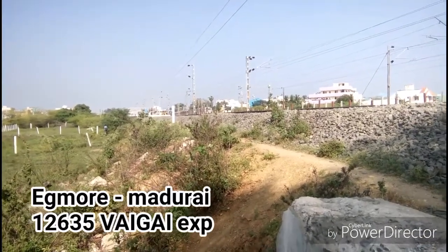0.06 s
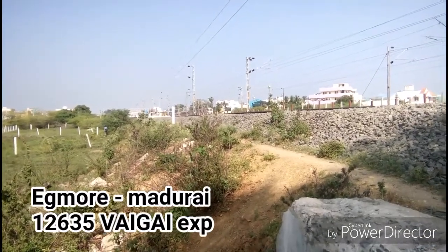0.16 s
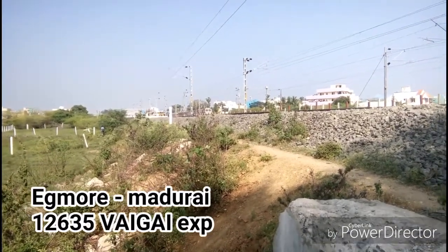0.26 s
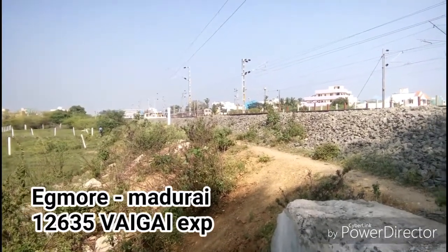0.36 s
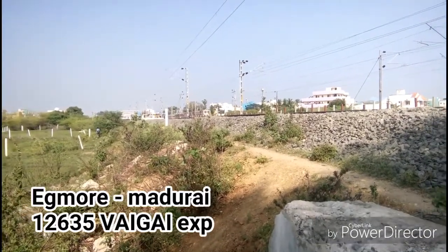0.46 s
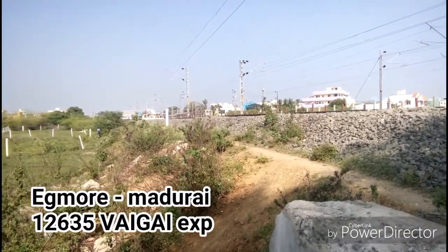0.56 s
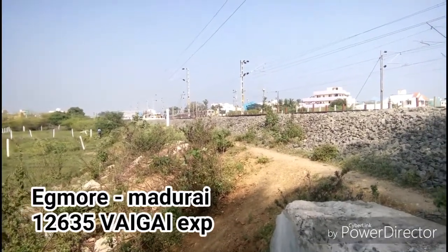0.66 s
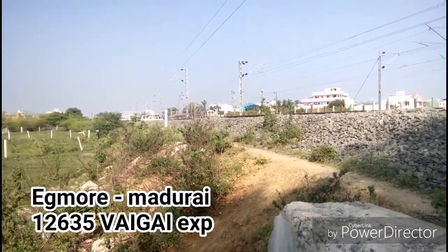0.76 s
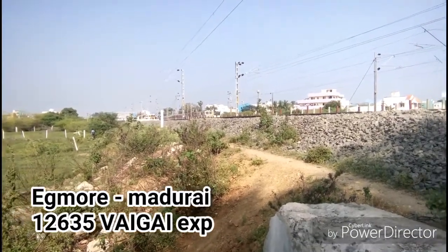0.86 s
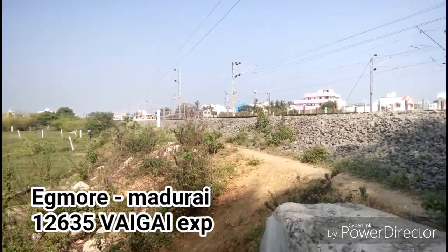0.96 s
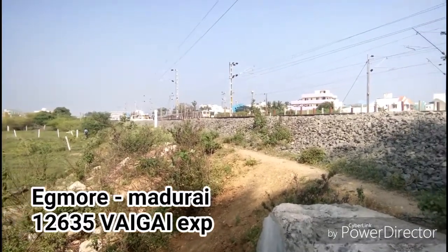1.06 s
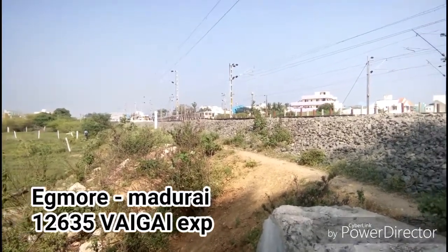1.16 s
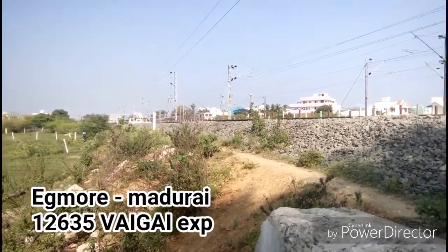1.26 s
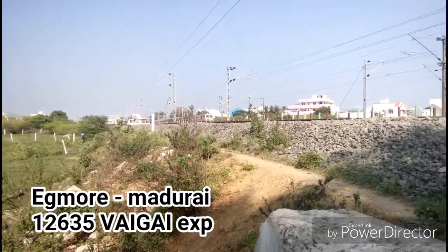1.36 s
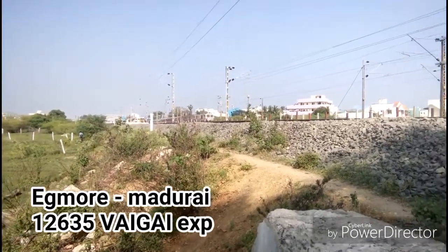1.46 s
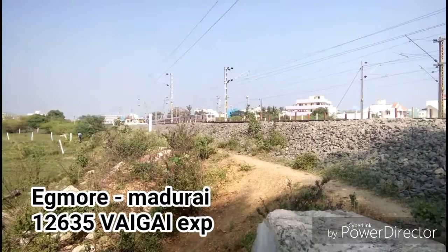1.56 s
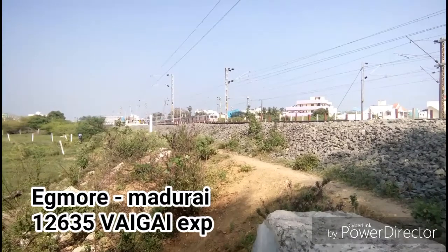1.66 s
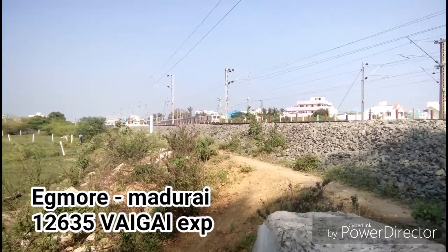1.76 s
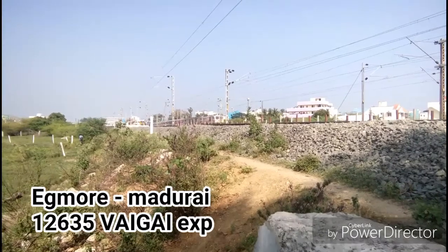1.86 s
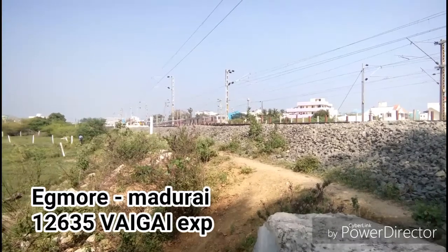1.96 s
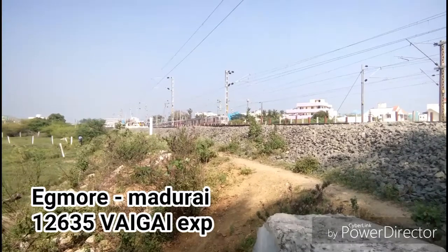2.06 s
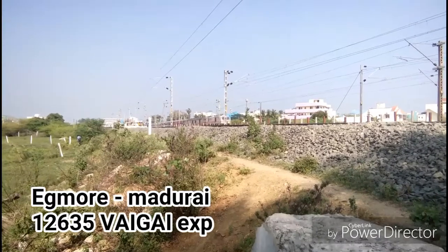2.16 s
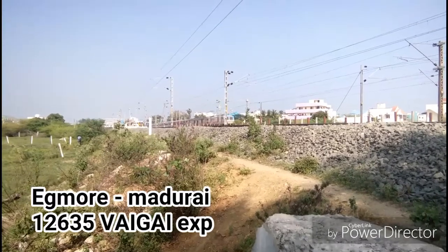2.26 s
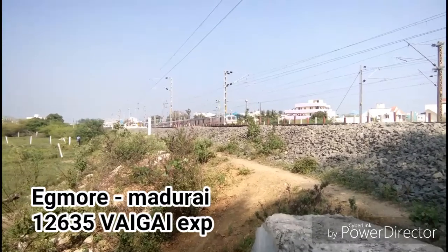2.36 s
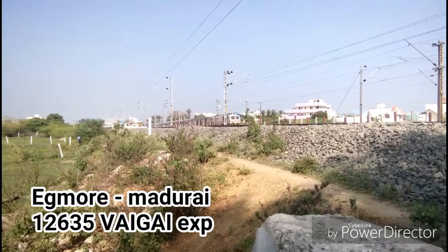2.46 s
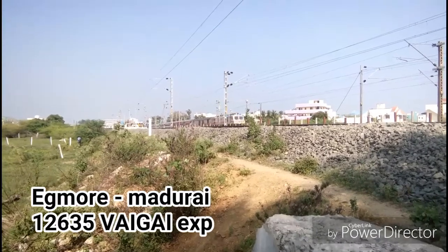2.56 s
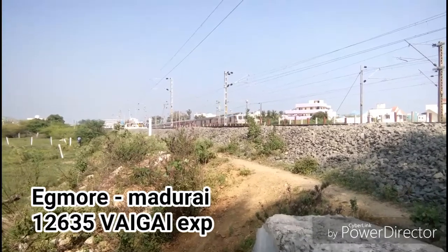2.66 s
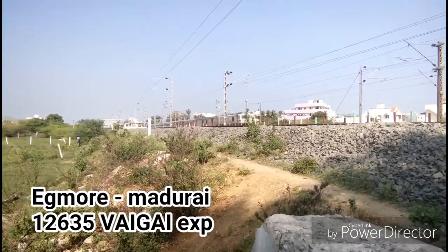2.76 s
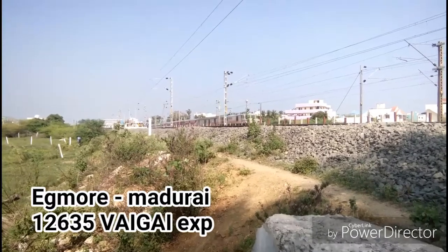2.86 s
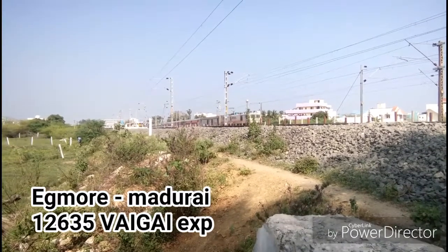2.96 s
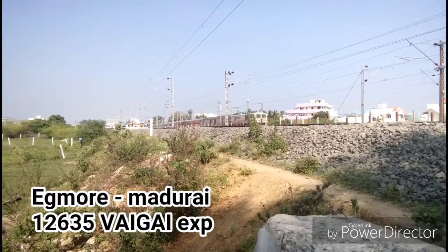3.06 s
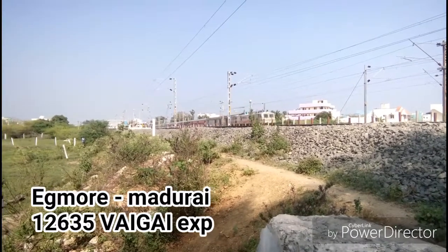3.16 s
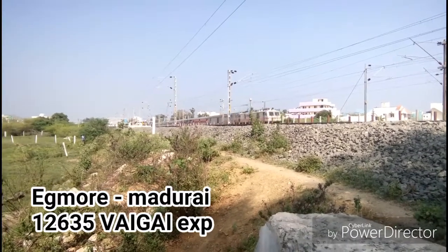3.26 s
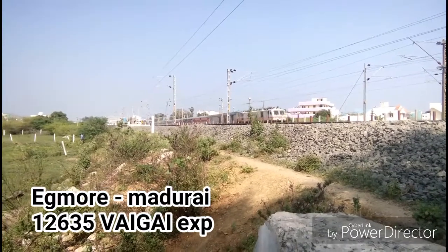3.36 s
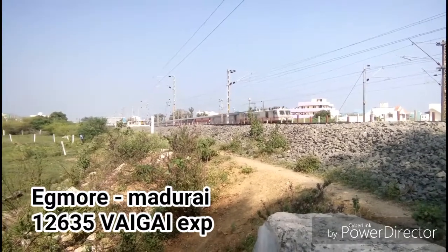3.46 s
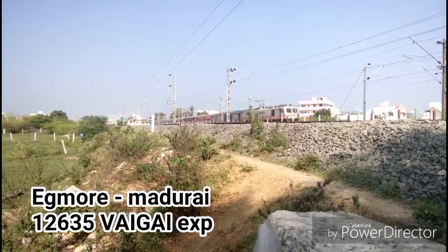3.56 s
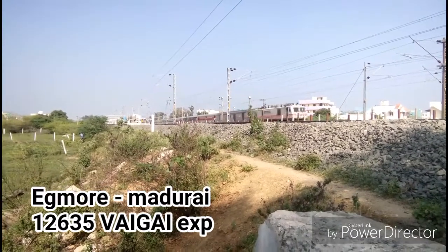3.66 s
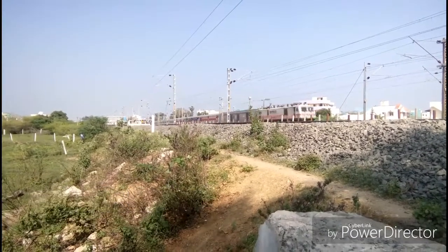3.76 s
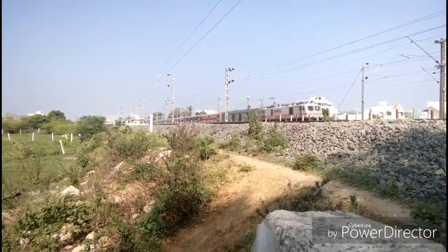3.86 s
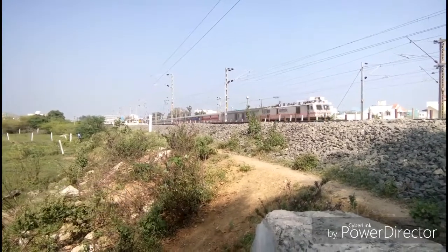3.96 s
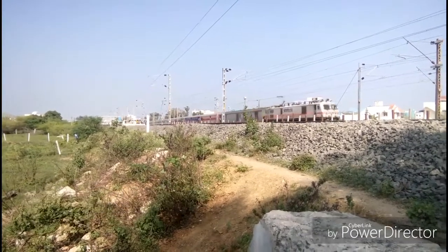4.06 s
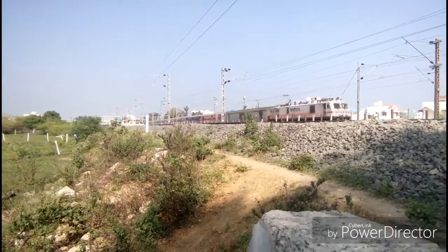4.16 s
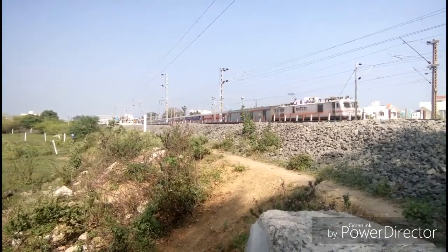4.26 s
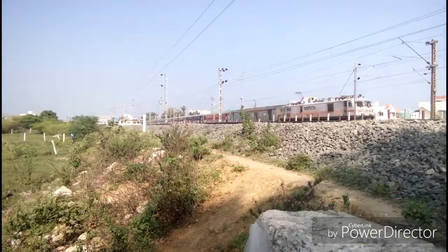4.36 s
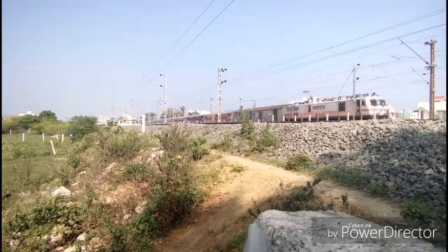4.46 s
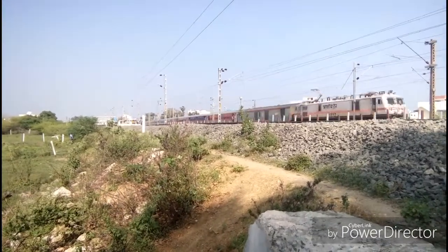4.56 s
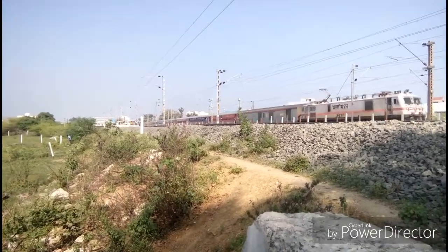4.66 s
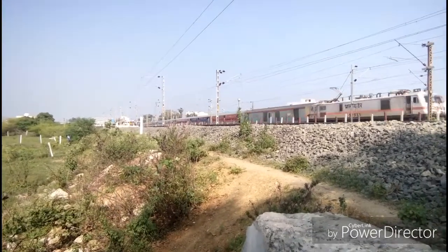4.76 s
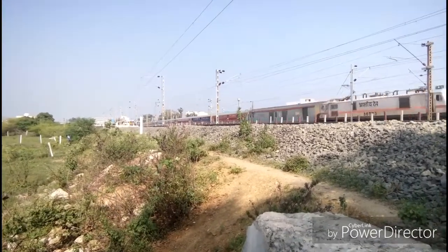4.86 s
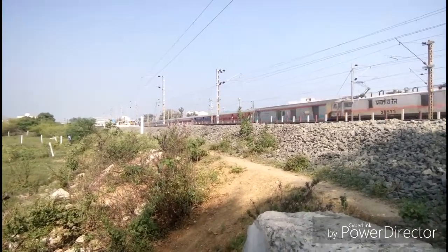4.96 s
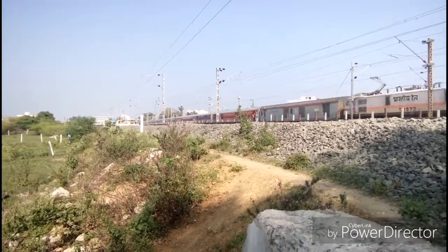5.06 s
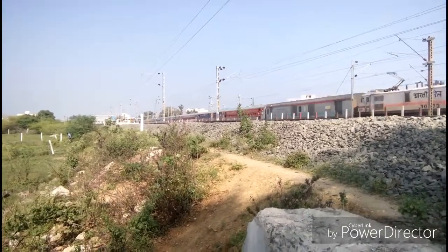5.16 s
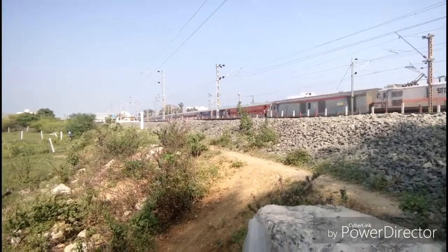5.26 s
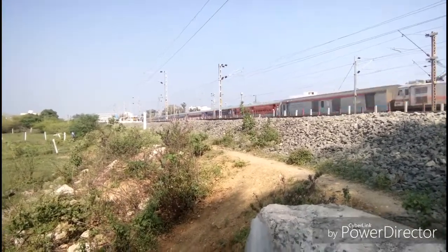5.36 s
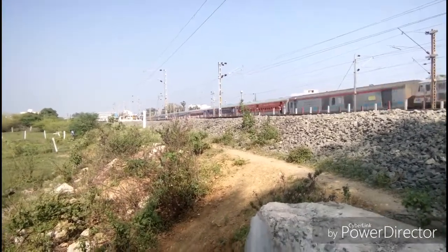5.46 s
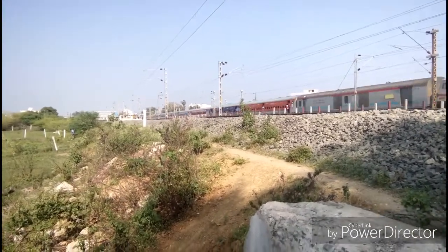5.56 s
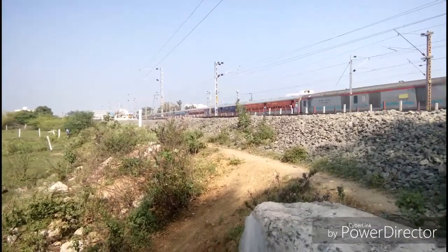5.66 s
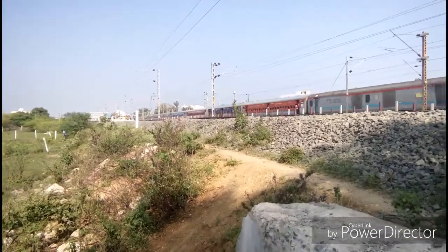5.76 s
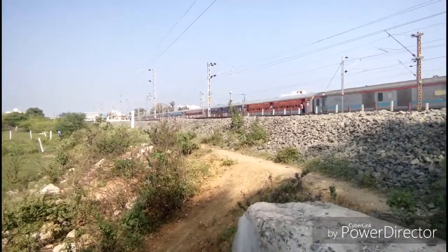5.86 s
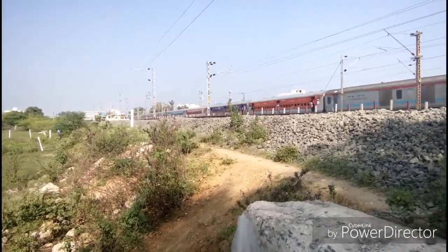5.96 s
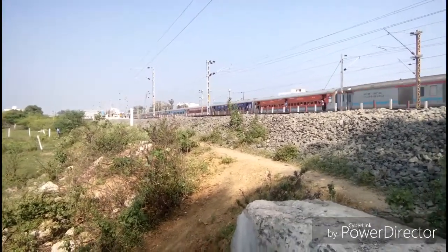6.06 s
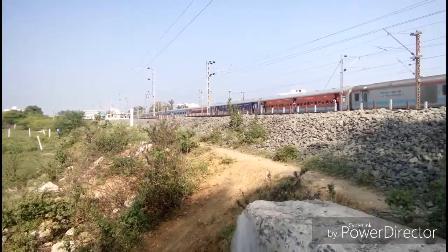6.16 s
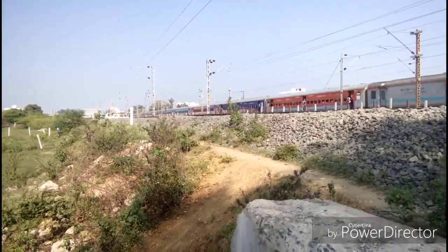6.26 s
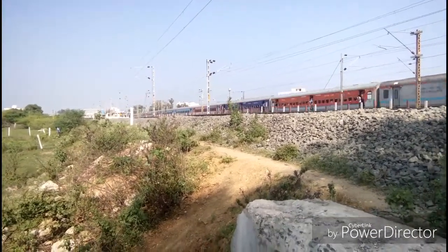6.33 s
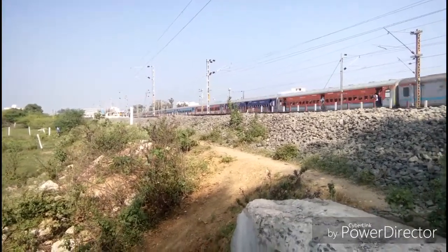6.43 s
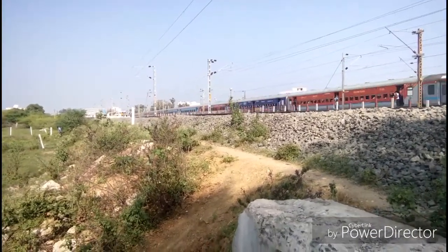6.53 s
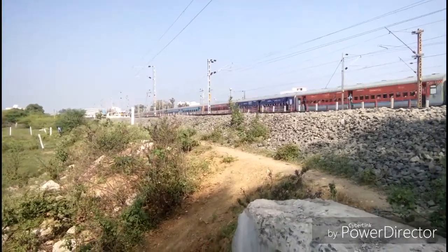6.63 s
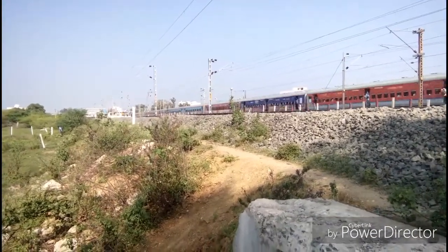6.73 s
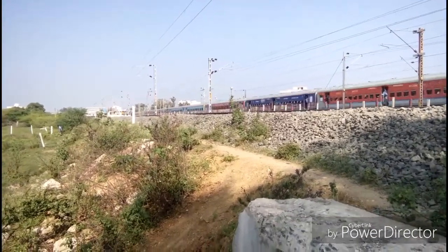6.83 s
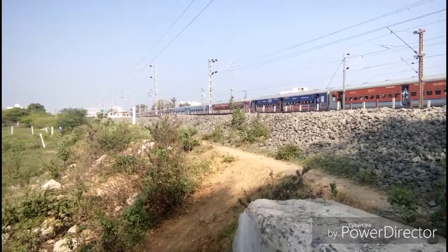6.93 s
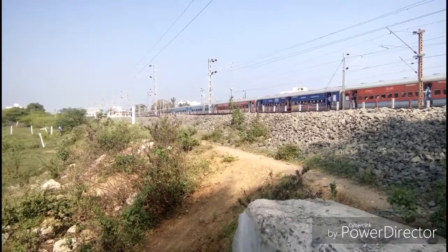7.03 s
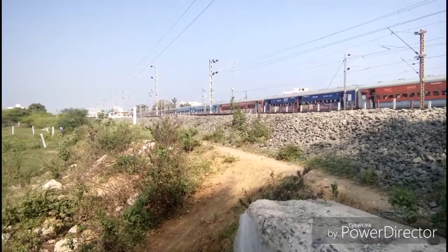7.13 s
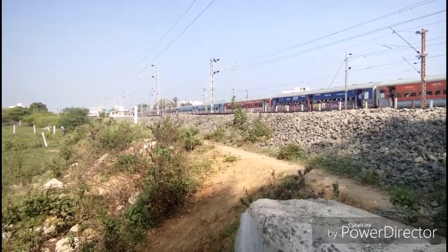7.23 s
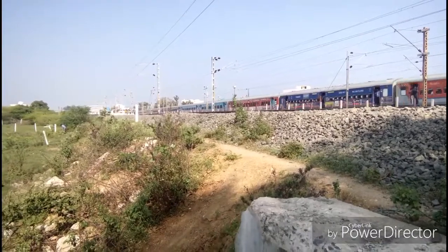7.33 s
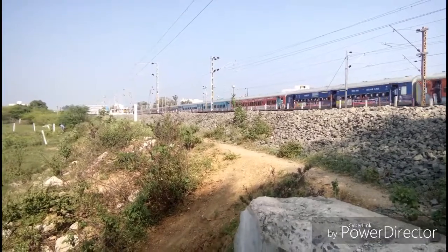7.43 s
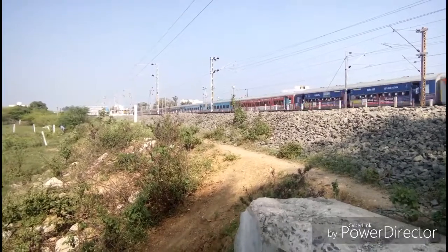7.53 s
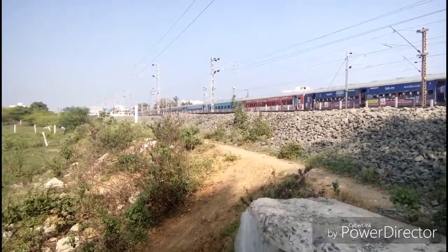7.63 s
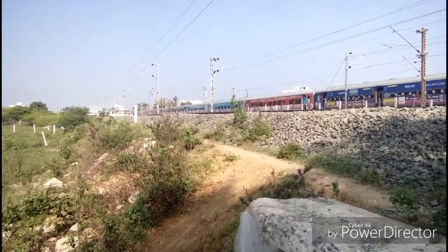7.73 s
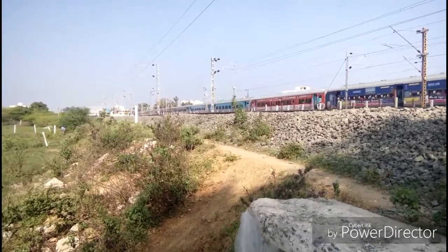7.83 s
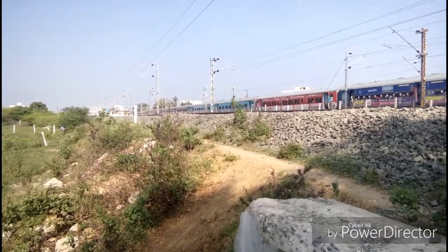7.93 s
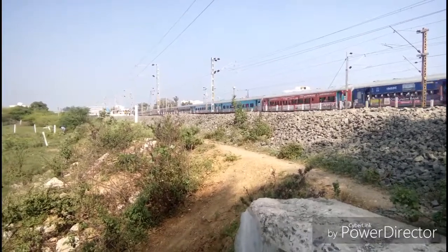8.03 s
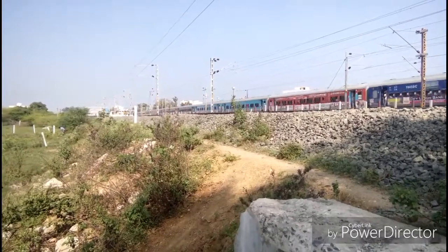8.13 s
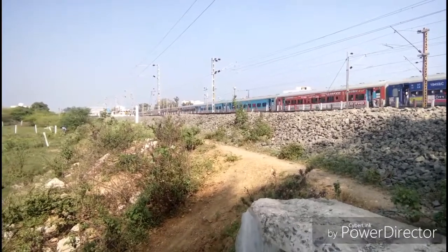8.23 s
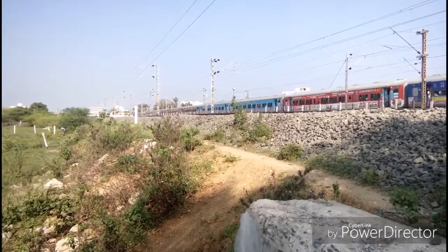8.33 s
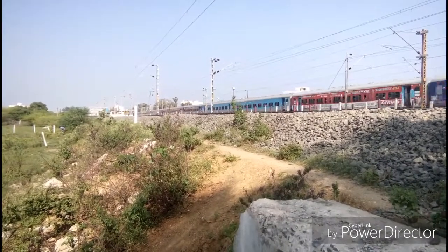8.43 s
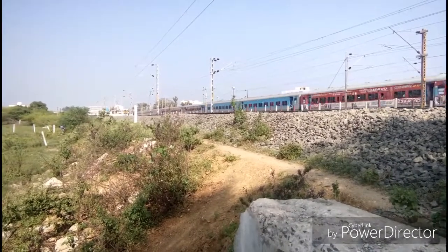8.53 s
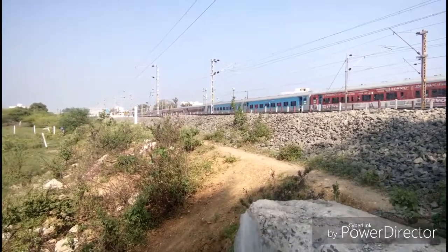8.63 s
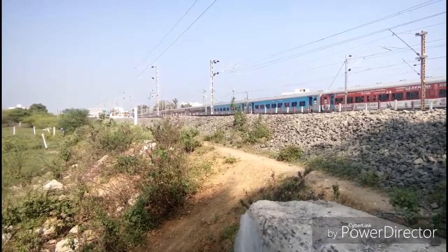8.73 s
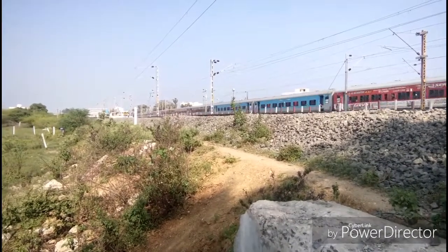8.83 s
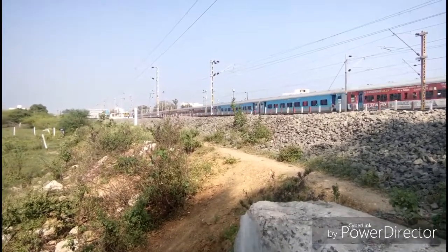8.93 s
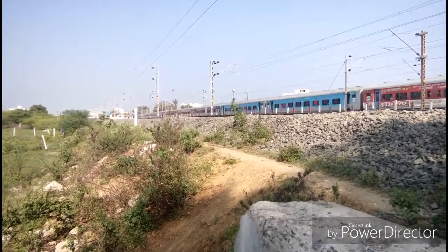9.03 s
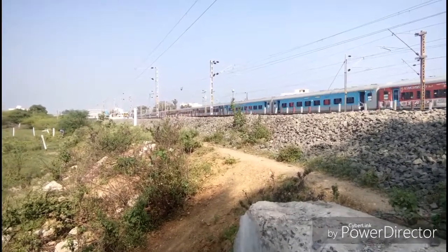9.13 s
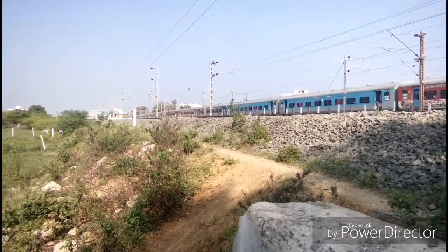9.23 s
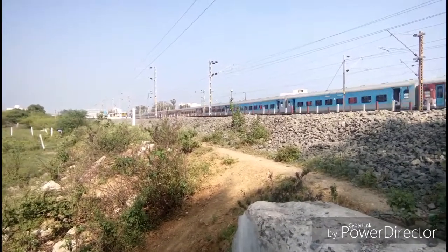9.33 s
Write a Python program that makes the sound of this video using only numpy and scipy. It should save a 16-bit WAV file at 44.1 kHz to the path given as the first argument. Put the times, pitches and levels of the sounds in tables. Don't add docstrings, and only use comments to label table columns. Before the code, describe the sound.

An open, dry outdoor place beside a railway bank. From 0 to 3 s a distant train makes a soft, uneven low rumble and thin roar, with a faint wavering whine near 570 Hz; small birds give brief falling chirps in the first second and a cluster of sharp, high calls at 2.4-3 s. From 3 s the rolling noise builds and faint low thuds begin; a longer bird pipe sounds near 4.7 s. Between 5.5 and 7 s the engine passes: full rumble, roar, hiss, thick thumps and knocks, and fluttering gear whine sliding downward. Carriages keep rattling past, hissing more, with heavier thumps from 7.7 s. At about 8.4 s a two-tone air horn speaks, low note first, then brightens into a loud, brassy, buzzing chord around 281 and 323 Hz. It wavers with echoes, dulls slightly after 9.1 s and continues to the end at 9.4 s.

```python
import sys
import numpy as np
from scipy import signal
from scipy.fft import rfft, irfft, next_fast_len
from scipy.io import wavfile
from scipy.ndimage import uniform_filter1d

SR = 44100
rng = np.random.default_rng(int(sys.argv[2]) if len(sys.argv) > 2 else 0)


def undo_db(level):
    steps = np.asarray(level, float) / 20
    return 10 ** steps


def store_pcm(level_fs):
    pcm = np.round(np.clip(level_fs, -1, 1) * 32767).astype(np.int16)
    wavfile.write(sys.argv[1], SR, np.atleast_2d(pcm).T)


N = 414099
T = np.arange(N) / SR


def curve(table):
    s, *columns = np.transpose(table)
    return [np.interp(T, s, c) for c in columns]


def bumps(events):
    return sum(db * np.exp(-((T - s) / half_s) ** 2) for s, half_s, db in events)


def walk(rate):
    hold = int(SR / rate)
    steps = np.repeat(rng.standard_normal(N // hold + 1), hold)
    return 1.01 * uniform_filter1d(uniform_filter1d(steps, hold), hold)[:N]


def tone(hz, db, scatter, rate):
    share = np.clip(scatter, 0, 1)
    paths = np.sqrt(1 - share) + np.sqrt(share / 2) * (walk(rate) + 1j * walk(rate))
    turning = np.exp(2j * np.pi * np.cumsum(hz) / SR)
    return np.sqrt(2) * undo_db(db) * np.real(paths * turning)


def band(colour, lo_hz, hi_hz):
    size = next_fast_len(N)
    log_hz = np.log(np.arange(1, size // 2 + 2) * SR / size)
    hz, db = np.transpose(colour)
    low_edge = 1 + np.exp(12 * (np.log(lo_hz) - log_hz))
    high_edge = 1 + np.exp(12 * (log_hz - np.log(hi_hz)))
    shape = undo_db(np.interp(log_hz, np.log(hz), db)) / np.sqrt(low_edge * high_edge)
    x = irfft(rfft(rng.standard_normal(size)) * shape, size)[:N]
    return x / x.std()


def patchy(x, depth_db, streak_db):
    hz, _, cells = signal.stft(x, SR, nperseg=1024)

    def blur(wide, long):
        grain = uniform_filter1d(rng.standard_normal(cells.shape), wide, axis=0)
        return np.sqrt(wide * long) * uniform_filter1d(grain, long, axis=1)

    db = depth_db * blur(12, 5) + streak_db * blur(2, 6)
    db = db * np.clip(hz / 2200, 0, 1)[:, None] ** 1.5
    return signal.istft(cells * undo_db(db), SR)[1][:N]


# (time [s], peak level [dB], low note level [dB], last note level [dB], stretch [ratio])
NEAR_CALLS = [
    (2.449, -51.5, -58, -67, .8),
    (2.612, -48, -64, -64, 1.05),
    (2.778, -48, -70, -67, 1.0),
    (2.951, -50.5, -72, -71, .75),
]
# (time after start [s], length [s], from [Hz], to [Hz], level [dB])
CALL_NOTES = [
    (0, .008, 5700, 4740, -4),
    (0.012, 0.02, 5500, 4800, 0),
    (0.04, .016, 4450, 4400, 5.5),
    (.053, .011, 4500, 5350, 11),
]
# (time [s], length [s], from [Hz], to [Hz], peak level [dB])
FAR_CHIRPS = [
    (0, 0.053, 2960, 2970, -67),
    (0.056, .022, 2750, 2170, -55),
    (0.087, .007, 4900, 4200, -60),
    (.1, .05, 4250, 4200, -65),
    (0.178, 0.0068, 4900, 4200, -57),
    (0.524, 0.017, 1835, 1450, -45.5),
    (0.915, 0.043, 2970, 2970, -60),
    (.948, 0.022, 2750, 2300, -59),
    (4.735, 0.1, 2550, 2570, -54),
]


def bird():
    out = np.zeros(N)
    flutter_db = 1.5 * walk(250)
    chirps = list(FAR_CHIRPS)
    for s, top_db, low_db, last_db, stretch in NEAR_CALLS:
        for db, note in zip((top_db, top_db, low_db, last_db), CALL_NOTES):
            after, length, from_hz, to_hz, under_db = note
            chirps.append((s + after, length * stretch, from_hz, to_hz, db + under_db))
    for s, length, from_hz, to_hz, db in chirps:
        start = int(s * SR)
        u = np.linspace(0, 1, int(length * SR))
        phase = 2 * np.pi * np.cumsum(from_hz + (to_hz - from_hz) * u) / SR
        level = undo_db(db - 1 + flutter_db[start:start + len(u)])
        out[start:start + len(u)] += level * np.sin(np.pi * u) * np.sin(phase)
    return out


# (frequency [Hz], density [dB per Hz])
FAR_COLOUR = [(25, -31), (48, -10), (100, 0.5), (150, -13), (400, -20), (530, -16), (1320, -18.5),
              (2000, -22), (2550, -21.5), (2850, -30), (3600, -26.5), (4500, -30), (6400, -38), (7500, -52)]
# (frequency [Hz], density [dB per Hz])
NEAR_COLOUR = [(25, -11.5), (46, -31), (60, -4), (110, 3), (165, -7.5), (250, -7.5), (450, -15.5),
               (530, -17), (680, -18), (1420, -23), (1760, -20.5), (2020, -29.5), (5600, -45), (7600, -72)]
# (time [s], level [dB])
APPROACH = [(0, -16), (1, -15), (2.5, -14), (3.8, -11), (4.9, -7.5), (5.4, -5), (6.1, -1), (6.6, 0.5),
            (7.5, -.5), (8.4, 0), (9.39, 0.5)]
# (level abreast [dB], gain per approach [dB/dB], early through ground [s], surge share [ratio])
WHEEL_LAYERS = [
    (-31, 1.35, 0.17, 0.9),
    (-35.5, 1.63, 0.27, 0.52),
    (-37.5, 1.0047, 0.022, 0.05),
    (-45.5, 0.99, .02, 0.054),
]
# (time [s], half length [s], level [dB])
SURGES = [(.1, 0.21, -5), (0.577, 0.042, -18), (.68, 0.047, 4), (1.617, 0.042, 7), (1.07, .04, 6),
          (2.1, 0.065, -4), (2.22, .05, 5), (2.5, 0.23, -3.5), (4.08, 0.11, 0), (5.2, 0.042, 0),
          (9.22, 0.083, 4), (2.85, 0.07, 3), (3.56, 0.12, -3.5), (3.891, 0.068, 3.5), (4.36, .06, 3),
          (4.55, .06, -0.5), (4.92, 0.12, 1.5), (5.498, 0.039, -6.5), (5.7, 0.11, 4), (5.993, 0.12, -5),
          (6.24, 0.099, 4.5), (6.4, 0.051, -4.5), (6.62, 0.055, 0.5), (6.892, 0.07, -6.5),
          (7.06, 0.043, -1), (7.56, 0.074, 3.5), (7.709, 0.078, -5.5), (8.128, 0.055, 6), (8.25, .06, 1.5),
          (8.347, 0.038, -6), (8.43, .04, 5), (8.79, 0.031, 4), (9.007, 0.11, 1.5)]
# (time [s], half length [s], level [dB])
GUSTS = [
    (4.95, .12, -5),
    (5.4, .12, 1.5),
    (5.62, .05, -2),
    (5.82, .05, 1),
    (6.2, .06, -5),
    (6.38, .1, 3),
    (6.62, .05, -3),
    (7.02, .05, -2),
    (7.5, .05, -3),
    (8.1, 0.31, -2.5),
]


def rolling():
    near = np.clip((T - 2.5) / 3.5, 0, 1)
    approach_db, surge_db = curve(APPROACH)[0], bumps(SURGES)
    levels = []
    for top_db, slope, early_s, share in WHEEL_LAYERS:
        levels.append(top_db + slope * np.interp(T + early_s, T, approach_db) + share * surge_db)
    levels[-1] += 1.76 * np.maximum(T - 6.5, 0)
    cutting = np.clip((T - 5.1) / 0.17, 0, 1) * np.clip((6.6 - T) / 2.3, 0, 1)
    levels[-1] += 1.3 * cutting
    edges_hz = [10, 150, 330, 1900, 9000]
    flicker_db = [1.3, 1.6, 0.5, 0.3]
    trim_db = [-1.0, 1.26, 2.5, -0.26]
    out = 0
    for k in range(4):
        far = band(FAR_COLOUR, *edges_hz[k:k + 2])
        close = band(NEAR_COLOUR, *edges_hz[k:k + 2])
        gain = undo_db(levels[k] + trim_db[k] + flicker_db[k] * walk(11))
        out = out + gain * (np.sqrt(1 - near) * far + np.sqrt(near) * close)
    thin = signal.sosfiltfilt(signal.butter(4, 4800, "high", fs=SR, output="sos"), out)
    out = out + (undo_db(bumps(GUSTS) - 0.5) - 1) * thin
    return patchy(out, depth_db=0.9, streak_db=2.3)


# (time [s], peak level [dB], pitch [Hz])
THUMPS = [(5.626, -21, 126), (5.774, -19, 147), (5.892, -21, 94.8), (6.042, -22, 82), (6.108, -22, 99),
          (6.254, -19.5, 134), (6.444, -25.5, 98), (6.772, -23.5, 105), (6.988, -20, 125),
          (7.168, -22, 81.7), (7.418, -23, 121), (7.745, -16, 101), (7.849, -20, 109), (8.077, -17, 100.7),
          (8.301, -12.5, 116.5), (8.421, -36, 107), (8.537, -15, 97.4), (8.592, -15.5, 121),
          (8.65, -17.5, 93), (8.807, -25, 216), (8.885, -18, 95.5), (8.929, -17.5, 128),
          (9.013, -15.5, 112), (9.05, -19, 140), (9.08, -20, 75), (9.127, -13, 148), (9.19, -19, 78)]
# (time [s], peak level [dB], pitch [Hz])
FAR_THUMPS = [(3.355, -43, 113.4), (3.498, -37, 99.6), (3.702, -43, 88.7), (3.812, -32, 91.5),
              (4.022, -37, 96.9), (4.113, -32, 96.9), (4.198, -32, 97), (4.334, -29, 96), (4.552, -35, 80),
              (4.902, -25, 92.3), (5.002, -30, 96.9), (5.118, -35, 102.4), (5.568, -27, 78.5)]
# (time [s], peak level [dB], pitch [Hz])
KNOCKS = [(5.562, -32.5, 280), (5.634, -22, 172), (5.707, -20.5, 245), (5.782, -20, 241), (5.89, -28, 200),
          (5.935, -29, 227), (6.028, -22, 233), (6.108, -18.5, 248), (6.18, -22, 210), (6.269, -21, 245),
          (6.437, -28, 189), (6.479, -40, 229), (6.544, -31, 230), (6.631, -32, 272), (6.671, -29, 210),
          (6.747, -29, 208), (6.828, -31, 253), (6.888, -25, 275), (6.984, -22, 204), (7.166, -21.5, 267),
          (7.264, -26, 238), (7.347, -22.5, 259), (7.407, -27, 203), (7.445, -31, 235), (7.504, -28, 223),
          (7.583, -25.5, 249), (7.685, -26.5, 241), (7.738, -26.5, 355), (7.8, -29, 270),
          (7.885, -27.5, 236), (7.965, -22, 257), (8.01, -23, 250), (8.091, -19.5, 258), (8.165, -28, 267),
          (8.317, -32, 321), (8.383, -24, 287)]


def bogies():
    out, t = np.zeros(N + SR), np.arange(SR // 5) / SR
    for s, db, hz in THUMPS + FAR_THUMPS:
        start = int(s * SR)
        shape = t / 0.014 * np.exp(1 - t / 0.011)
        overtone = 0.48 * np.exp(-t / 0.03) * np.sin(2 * np.pi * 2.5 * hz * t)
        ring = np.sin(2 * np.pi * hz * t) + overtone
        out[start:start + len(t)] += undo_db(db - 5) * shape * ring
    for s, db, hz in KNOCKS:
        start = int(s * SR)
        shape = t / 0.01 * np.exp(1 - t / 0.0084)
        out[start:start + len(t)] += undo_db(db - 3.5) * shape * np.sin(2 * np.pi * hz * t)
    return out[:N]


# (time [s], pitch [Hz])
GEAR_HZ = [(0, 572), (4.9, 571), (5.2, 569), (5.6, 564), (5.9, 553), (6.3, 550), (6.6, 544), (7.3, 532),
           (7.65, 518), (8.0, 514), (9.39, 510)]
# (time [s], level [dB])
GEAR_DB = [(0, -67), (1.55, -61.5), (1.95, -54), (2.25, -67), (2.55, -67), (2.8, -48), (3.75, -50),
           (4.14, -65), (4.19, -39.5), (4.65, -44), (5.0, -34.5), (5.35, -45), (5.7, -38), (5.98, -31),
           (6.7, -36), (7.2, -38), (8.3, -38), (8.7, -56)]
# (time [s], pitch [Hz], level [dB])
SECOND_MOTOR = [(0, 533, -63), (1.2, 528, -55), (1.75, 528, -58), (2.2, 540, -75), (2.6, 543, -58),
                (2.75, 539, -51), (3.1, 541, -48.5), (3.17, 541, -53), (3.3, 541, -48), (3.4, 540, -47),
                (3.48, 544, -53), (3.56, 540, -63), (3.66, 538, -48), (3.75, 537, -52), (4.0, 550, -63),
                (4.4, 530, -59)]
# (time [s], pitch [Hz], level [dB])
THIRD_MOTOR = [
    (.9, 516, -63),
    (2.1, 498, -60),
    (2.4, 502.3, -70),
    (2.9, 502, -58),
    (4.0, 498, -70),
    (5.0, 518.3, -48),
    (6.5, 507.6, -42),
    (7.0, 505, -40.5),
    (7.6, 499, -49),
]
# (time [s], pitch [Hz], level [dB])
BLOWER = [
    (3.1, 623, -77),
    (3.47, 620, -57),
    (3.56, 616, -64),
    (3.66, 622, -53),
    (3.85, 625, -58),
    (4, 622, -62),
    (4.3, 639, -54.5),
    (5.0, 632.4, -53.5),
    (5.4, 612, -68),
]
# (level abreast [dB], gain per approach [dB/dB])
OVERTONES_DB = [
    (-50, 1.5),
    (-41.5, 1.35),
]
# (time [s], pitch [Hz])
BLEND_HZ = [(0, 1716), (5.1, 1708), (5.7, 1690), (5.95, 1648), (6.3, 1628), (6.75, 1610), (7.05, 1570),
            (7.5, 1590), (7.85, 1555), (8.3, 1570), (9.39, 1545)]
# (time [s], half length [s], level [dB])
SHADOWS = [(3.0, 0.046, -13), (3.3, 0.035, -10), (3.45, .04, -3), (3.56, 0.043, -11), (3.65, .04, 3.5),
           (3.77, 0.038, -4), (4.3, 0.064, -6.5), (4.41, .05, -4), (5.1, 0.016, -12), (5.52, 0.02, -1),
           (5.7, 0.05, -7), (5.765, .015, -8), (5.8, 0.016, 2.5), (5.84, 0.017, -17), (5.925, .014, -8),
           (5.98, 0.034, 4.5), (6.045, 0.012, -10), (6.145, 0.029, -17), (6.23, 0.034, -5),
           (6.35, 0.07, -7), (6.555, 0.024, -9), (6.63, .015, -4), (6.7, 0.023, 3), (6.8, 0.038, -2),
           (7.03, 0.075, -15), (7.2, 0.009, 11), (7.3, 0.036, -7), (7.42, 0.04, -9), (7.7, .05, -6.5),
           (7.82, 0.1, -11), (8.03, .04, -3.5), (8.14, 0.086, -9.5), (8.32, .05, 4)]
# (time [s], half length [s], level [dB])
FLARES = [
    (4.5, .1, 15),
    (4.8, .08, 4),
    (5.05, 0.1, 12),
    (5.3, 0.15, 11),
    (5.82, 0.06, 13),
    (6.05, .04, 12.5),
    (6.23, 0.061, 12),
    (6.42, 0.034, 8),
    (6.65, 0.036, 15.5),
]
# (time [s], half length [s], level [dB])
THIRD_FLARES = [
    (2.9, 0.84, 1.5),
    (4.8, .3, -3.5),
    (6.25, 0.073, 0),
    (6.45, 0.068, 3.5),
    (6.75, 0.12, 3),
    (7.15, 0.16, -7),
    (7.7, .12, 2),
    (8.05, .12, 4.5),
    (8.3, 0.1, 7),
    (8.48, .06, 10),
]


def motors():
    hz, db = curve(GEAR_HZ)[0], curve(GEAR_DB)[0]
    approach_db = curve(APPROACH)[0]
    second_db, third_db = (top_db + slope * approach_db for top_db, slope in OVERTONES_DB)
    abreast = np.exp(-((T - 6.5) / 1.3) ** 2)
    gear = tone(hz, db + 1 + bumps(SHADOWS) + 1.2 * walk(10), scatter=0.2, rate=40)
    smeared = tone(hz, uniform_filter1d(db, SR // 2) - 3, scatter=1, rate=55)
    gear += np.sqrt(0.096 + abreast) * smeared
    rear_hz = np.interp(T - 0.3, T, hz)
    second_db = second_db - 4.5 + 3 * np.exp(-((T - 5.5) / 1.1) ** 2) + bumps(FLARES)
    gear += tone(2 * rear_hz, second_db, scatter=0.35, rate=45)
    third_db = third_db - 5.5 + 3 * abreast + bumps(THIRD_FLARES)
    for rate in (60, 150):
        gear += tone(curve(BLEND_HZ)[0], third_db, scatter=1, rate=rate)
    second = tone(*curve(SECOND_MOTOR), scatter=0.2, rate=30)
    third = tone(*curve(THIRD_MOTOR), scatter=0.95, rate=45)
    return gear + second + third + tone(*curve(BLOWER), scatter=0.5, rate=34)


BLOWN_S = np.maximum(T - 8.39, 0)


def reed_hz(steady_hz, sharp_hz, settle_s, slide_hz_per_s):
    return steady_hz + sharp_hz * np.exp(-BLOWN_S / settle_s) + slide_hz_per_s * (T - 8.8)


# (multiple, level [dB])
LOW_ORDERS = [(1, 0), (2, -4), (3, -2), (4, -5), (5, -4), (6, -9), (7, -30.5), (8, -30), (9, -25),
              (10, -29), (11, -29.5), (12, -33), (13, -33.5), (14, -36), (15, -29), (16, -36), (17, -37.5),
              (18, -56), (19, -37), (20, -44), (21, -36), (22, -46), (23, -46.5), (24, -54)]
LOW_FADES = {1: [(8.5, 0.037, 1.5), (8.565, 0.024, -7), (8.86, 0.028, -2), (8.97, .05, -2.5),
             (9.1, .04, 1.5)], 2: [(8.55, .04, -4), (8.75, 0.094, 4), (9.08, .05, -2), (9.2, .03, -4)],
             3: [(8.5, .04, 2.5), (8.575, 0.021, -22), (8.62, .025, 3.5), (8.7, .08, -4),
             (8.88, 0.032, -12), (9.02, 0.04, -7), (9.17, 0.073, 3), (9.36, 0.047, 5)], 4: [(8.5, .04, 1),
             (8.7, .035, -9), (8.85, .035, -6), (9.0, 0.13, -6), (9.155, 0.042, -22), (9.24, 0.028, 2.5),
             (9.37, 0.045, -10)], 5: [(8.5, .05, 2.5), (8.59, .035, -3), (8.78, 0.04, -6), (8.88, .03, 4.5),
             (8.99, .04, -15), (9.15, .055, -15), (9.3, 0.037, 7)], 6: [(8.6, 0.028, -14),
             (8.72, 0.022, -7), (9.0, .15, 1.5), (9.18, .035, -10), (9.35, 0.049, -10)]}


def low_trumpet(first_db, upper_db, turn_db):
    low_hz = reed_hz(281.4, 15.8, 0.09, -1.5)
    strong = {1: first_db, 2: np.maximum(upper_db - 4.5, first_db - 9), 6: upper_db - 8.5}
    early_db = first_db - 7 - 7.5 * np.exp(-BLOWN_S / 0.05)
    for k in (3, 4, 5):
        strong[k] = np.maximum(upper_db, early_db) + dict(LOW_ORDERS)[k] - 4
    drift_hz = 2.5 * (T > 8.8)
    out = 0
    for k, db in LOW_ORDERS:
        if k in strong:
            hz = k * low_hz + drift_hz * walk(8)
            out = out + tone(hz, strong[k] + bumps(LOW_FADES[k]), scatter=0.015 * k, rate=30)
        else:
            sway_db = 3 * np.sin(3 * k * k + (40 - k) * T)
            level_db = upper_db + db + 0.5 + turn_db + sway_db
            out = out + tone(k * low_hz, level_db, scatter=0.3 + 0.025 * k, rate=25 + 2 * k)
    for k in range(25, 46, 2):
        spray_db = upper_db - 62 - 0.22 * k + 7 * walk(35)
        out = out + tone(k * low_hz, spray_db, scatter=1, rate=220)
    return out


# (multiple, level [dB])
HIGH_ORDERS = [(1, -12.5), (2, -15.5), (3, -5), (4, -13.5), (5, -7.5), (6, -23), (7, -16.5), (8, -25),
               (9, -19.5), (10, -25.5), (11, -24), (12, -27), (13, -28), (14, -33), (15, -35), (16, -34.5),
               (17, -28.5), (18, -35.5), (19, -38), (20, -42)]
HIGH_FADES = {1: [(8.6, .05, 4), (8.7, .05, -4), (8.82, .04, 6), (9.03, .04, -3), (9.3, .04, -4)],
              2: [(8.6, .04, -5), (8.68, .03, 0.5), (8.8, .08, -4), (8.96, .05, 5.5), (9.07, .07, 4),
              (9.165, .03, -2), (9.235, .03, 5), (9.31, 0.035, -6)], 3: [(8.54, .04, -6), (8.78, .12, -4),
              (8.96, .05, -0.5), (9.165, .03, -7), (9.26, .06, 0)], 4: [(8.63, .06, -4.5), (8.77, .06, 5),
              (8.89, .03, -4), (9.09, .04, 3), (9.165, 0.028, -3)], 5: [(8.6, .04, 0), (8.86, .08, 4.5),
              (9.04, .06, -0.5), (9.17, .04, -6), (9.33, .06, -8)]}
# (time [s], level [dB])
ECHO = [
    (8.55, 1),
    (8.85, 3),
    (9.39, 2.5),
]


def high_trumpet(upper_db, turn_db, turn_s):
    high_hz = reed_hz(322.7, 13, 0.07, -7)
    high_db = np.interp(T - 0.045, T, upper_db) - 5
    heard_hz = np.where(T > turn_s, 323.3, high_hz)
    out = 0
    for k, db in HIGH_ORDERS:
        if k in HIGH_FADES:
            fade_db = bumps(HIGH_FADES[k])
        else:
            fade_db = (k > 6) * (turn_db + 1.5) + 3 * np.sin(k * k + (22 + k) * T)
        scatter = 0.45 if k < 6 else 0.25 + 0.03 * k
        out = out + tone(k * heard_hz, high_db + db + fade_db, scatter, rate=50 + 2 * k)
    echo_db = curve(ECHO)[0]
    for k, db in HIGH_ORDERS[:6]:
        level_db = high_db + db + echo_db - 1.2 * k
        out = out + tone(k * high_hz * 0.966, level_db, scatter=0.94, rate=60)
    return out


# (time [s], fundamental level [dB], upper multiples level [dB])
BLAST = [
    (8.36, -57, -82),
    (8.42, -25.5, -49),
    (8.55, -22.5, -24.5),
    (8.63, -19.5, -23),
    (8.8, -20.5, -23),
    (8.9, -24, -22.5),
    (9.07, -21, -23),
    (9.22, -25, -23.5),
    (9.39, -26, -25.5),
]


def horns():
    first_db, upper_db = curve(BLAST)
    turn_s = 9.13
    turn_db = -4.5 * np.clip((T - turn_s) / 0.031, 0, 1)
    trumpets = low_trumpet(first_db, upper_db, turn_db) + high_trumpet(upper_db, turn_db, turn_s)
    air_colour = [(200, -12), (500, -20.5), (1600, -4), (2100, -20), (5500, -26), (7000, -58)]  # (Hz, dB)
    air = undo_db(upper_db - 19.5) * band(air_colour, 200, 7000)
    return (T > BLAST[0][0]) * (trumpets + air)


def scene():
    return (bird() + rolling() + bogies() + motors() + horns())[None]


def roll_off(x):
    return signal.sosfilt(signal.butter(12, 15480, fs=SR, output="sos"), x)


# (pitch [Hz], level [dB])
CIRCUIT_LINES = [
    (6448, -86),
    (12215, -92),
    (12898, -103),
]


def record(dry):
    x = dry - 0.3 * dry ** 3
    x = x + undo_db(-82) * band([(5000, -7), (9000, -8.5), (15000, -4.5)], 6000, 16000)
    for hz, db in CIRCUIT_LINES:
        x = x + np.sqrt(2) * undo_db(db) * np.sin(2 * np.pi * hz * T)
    return roll_off(x)


dry = scene()
out = record(dry)
store_pcm(out)
```